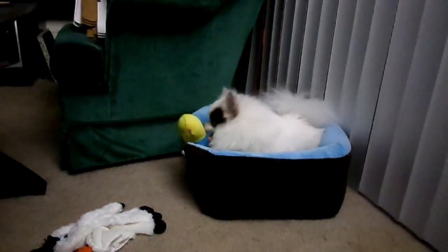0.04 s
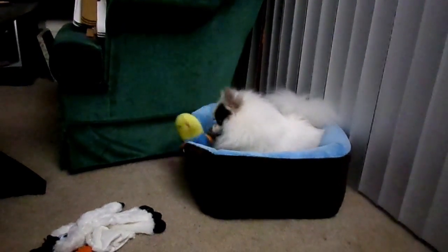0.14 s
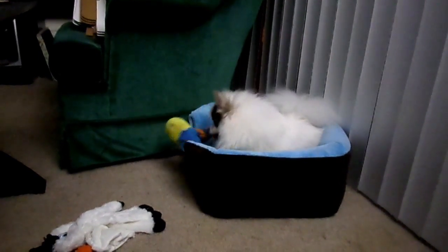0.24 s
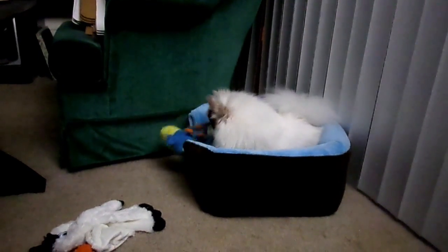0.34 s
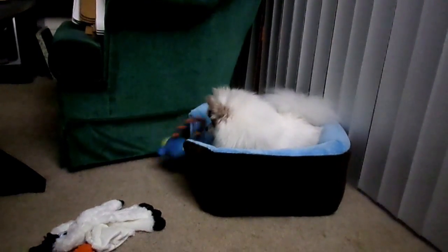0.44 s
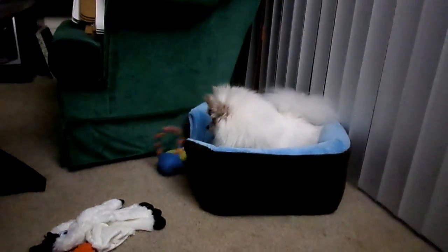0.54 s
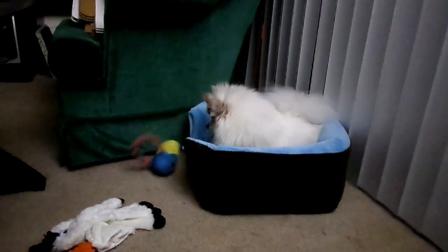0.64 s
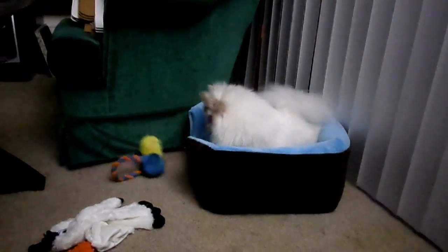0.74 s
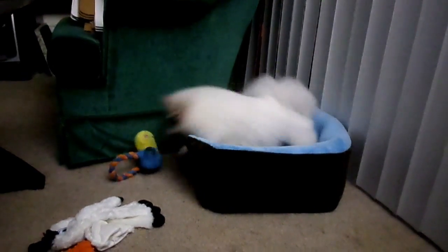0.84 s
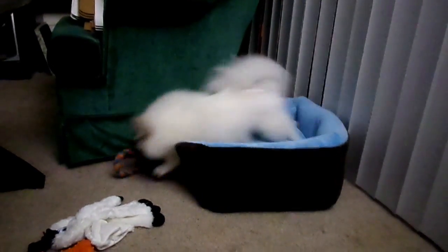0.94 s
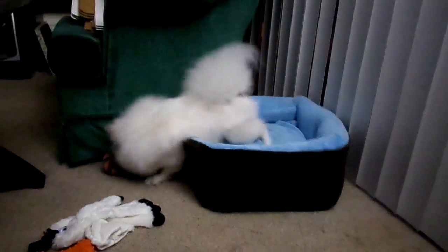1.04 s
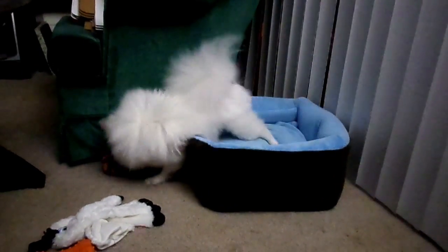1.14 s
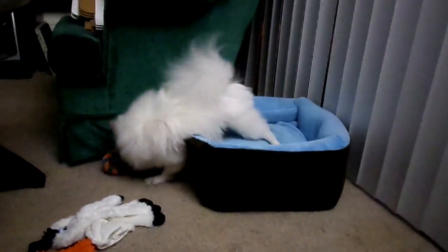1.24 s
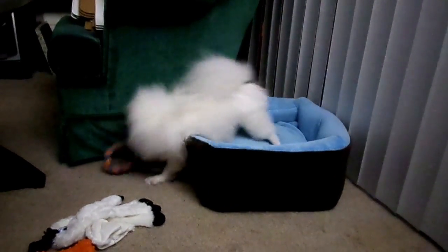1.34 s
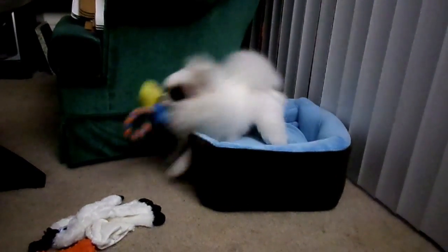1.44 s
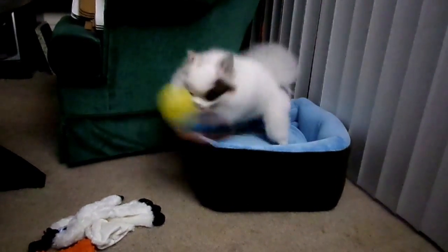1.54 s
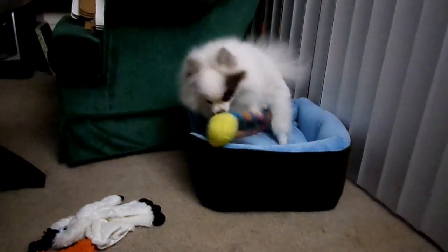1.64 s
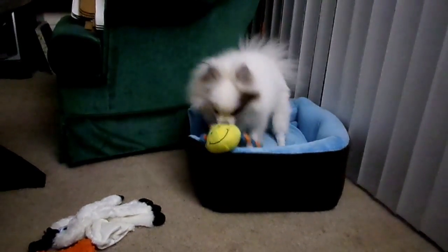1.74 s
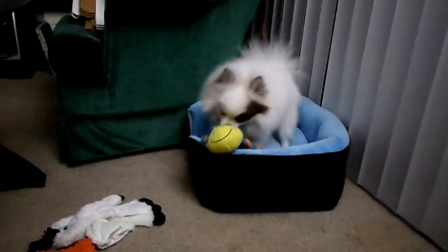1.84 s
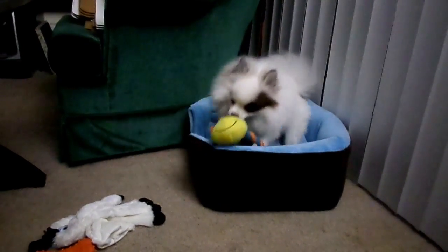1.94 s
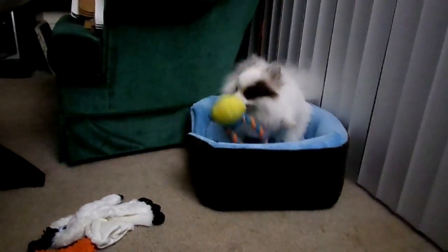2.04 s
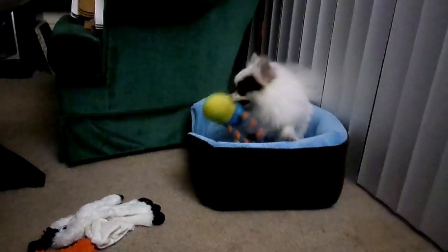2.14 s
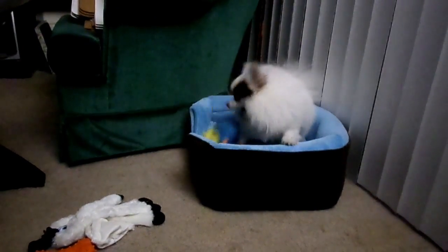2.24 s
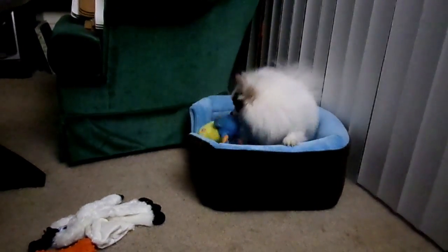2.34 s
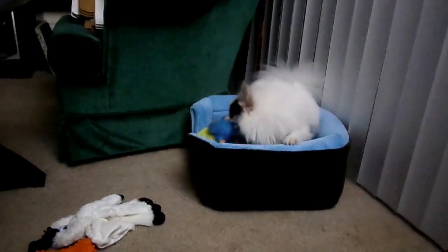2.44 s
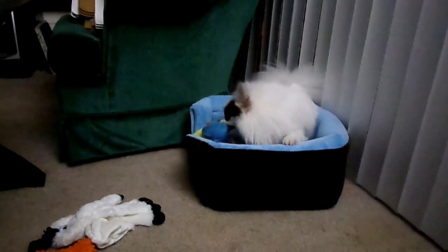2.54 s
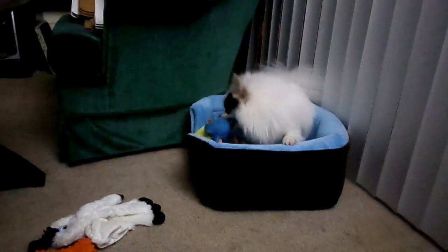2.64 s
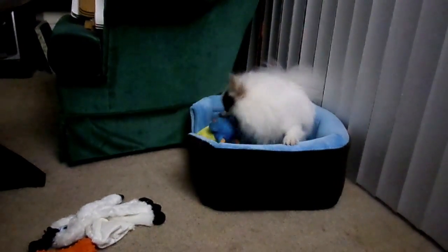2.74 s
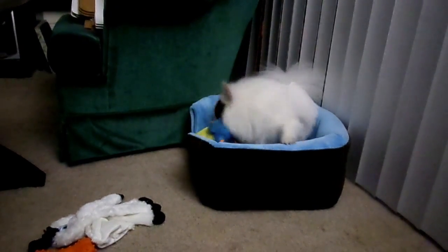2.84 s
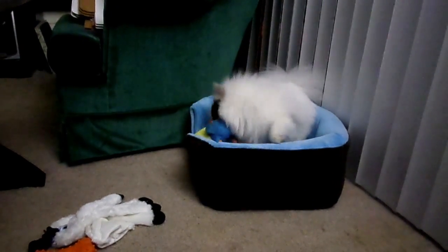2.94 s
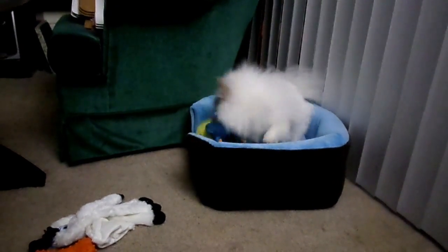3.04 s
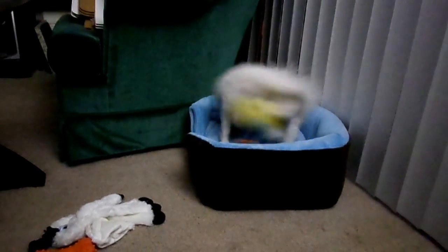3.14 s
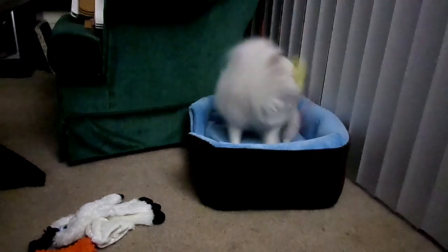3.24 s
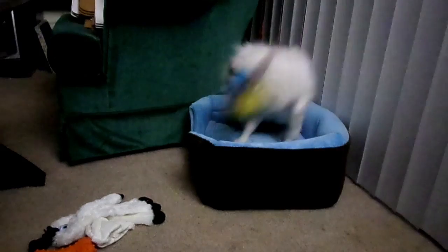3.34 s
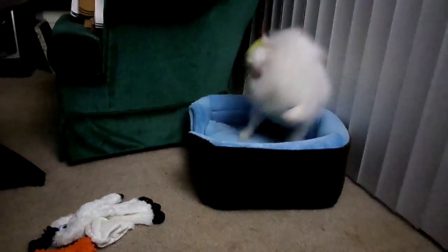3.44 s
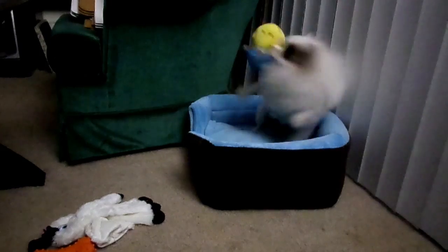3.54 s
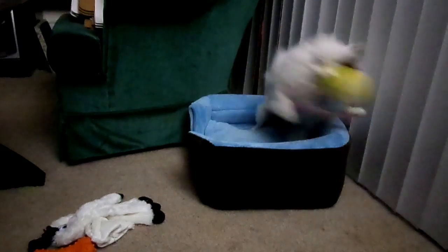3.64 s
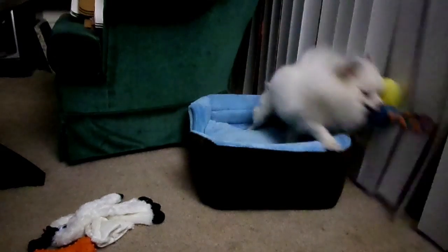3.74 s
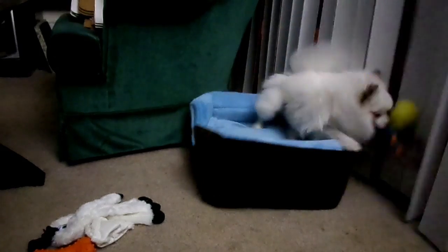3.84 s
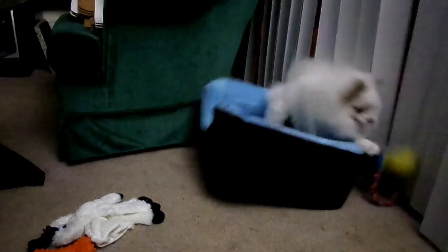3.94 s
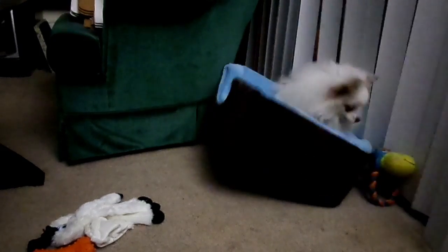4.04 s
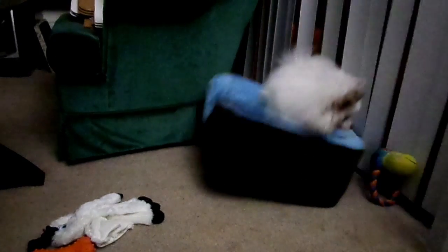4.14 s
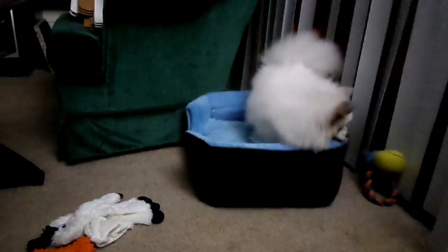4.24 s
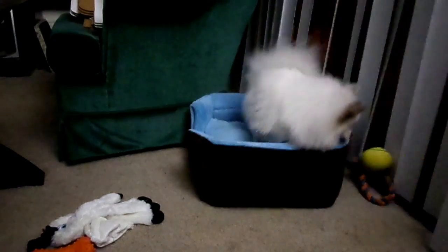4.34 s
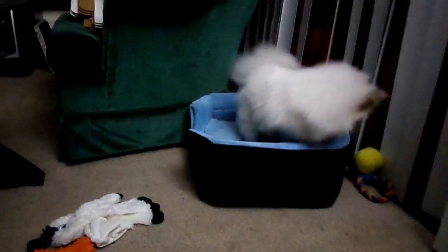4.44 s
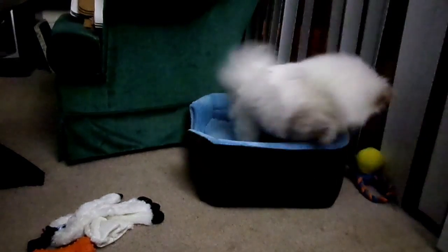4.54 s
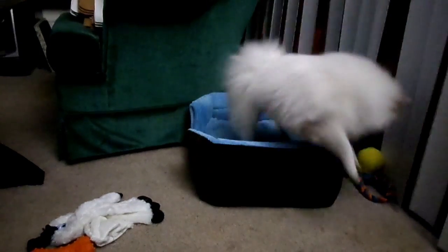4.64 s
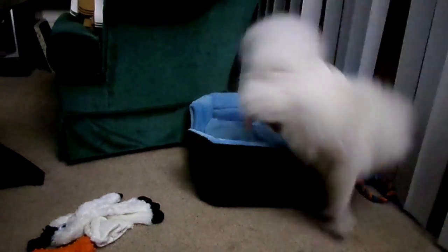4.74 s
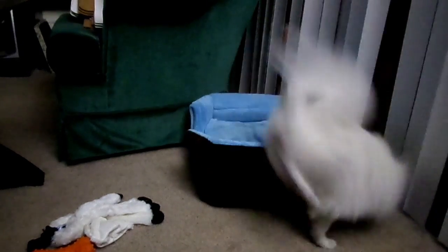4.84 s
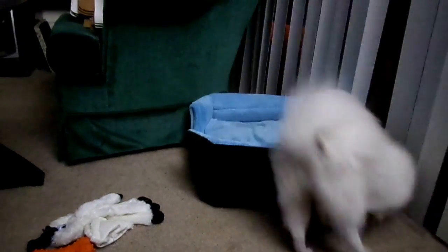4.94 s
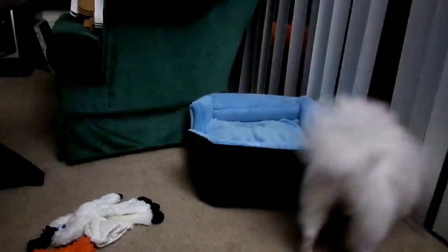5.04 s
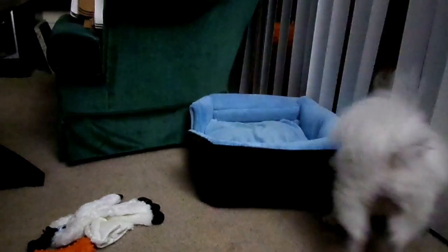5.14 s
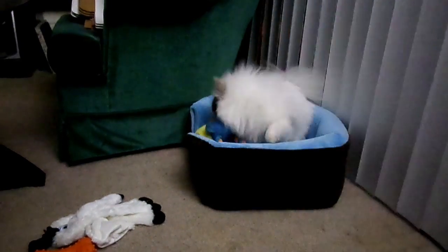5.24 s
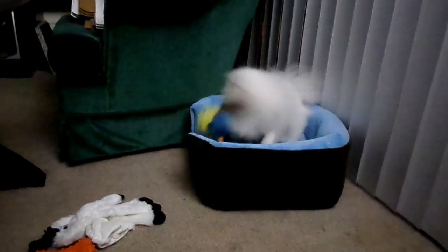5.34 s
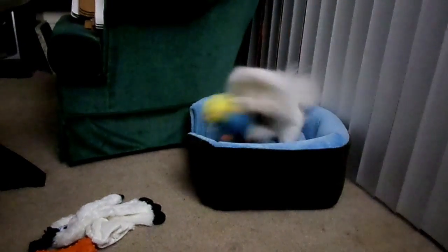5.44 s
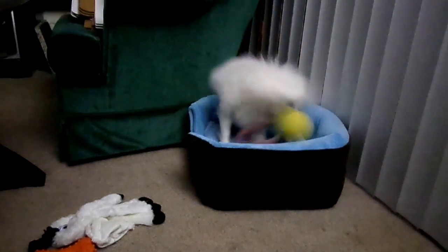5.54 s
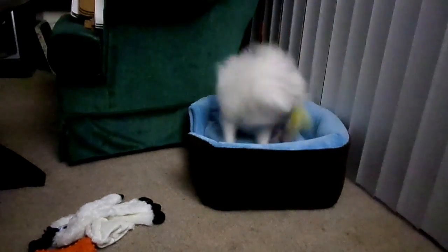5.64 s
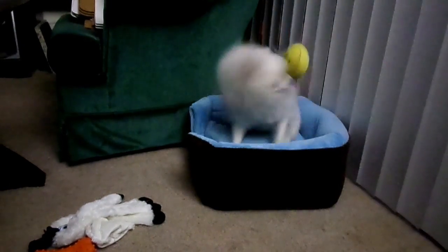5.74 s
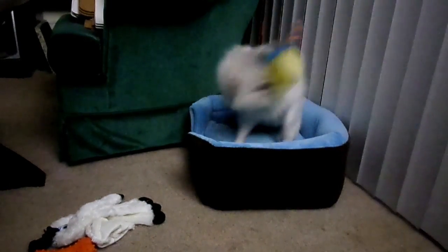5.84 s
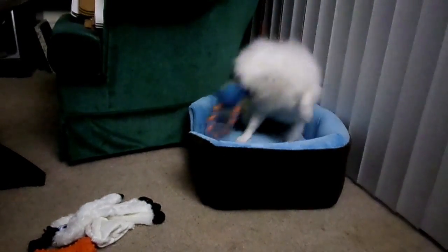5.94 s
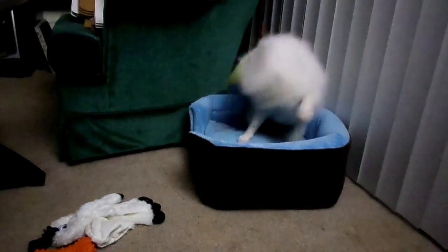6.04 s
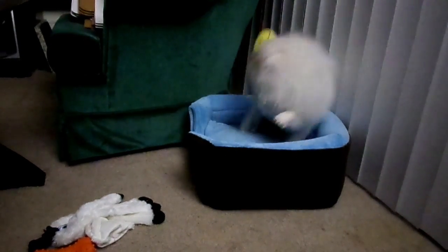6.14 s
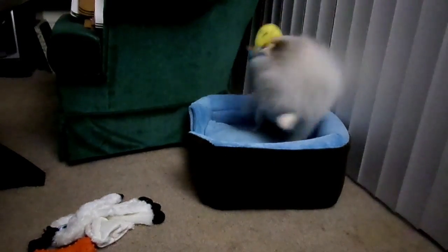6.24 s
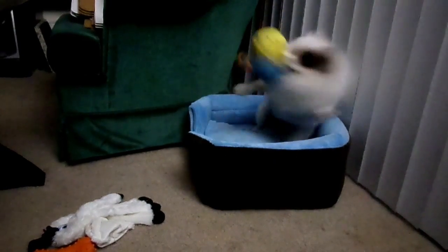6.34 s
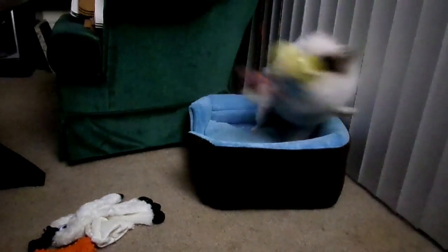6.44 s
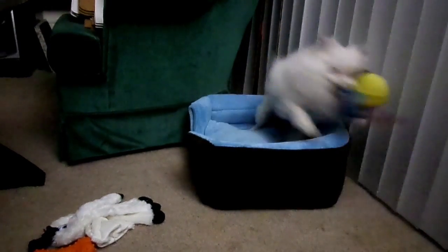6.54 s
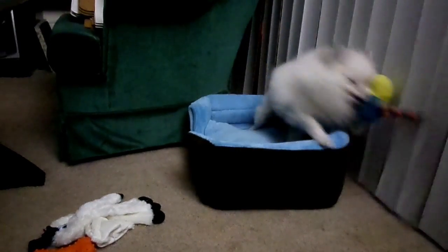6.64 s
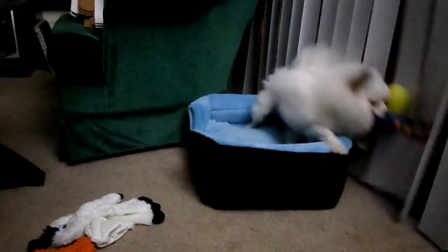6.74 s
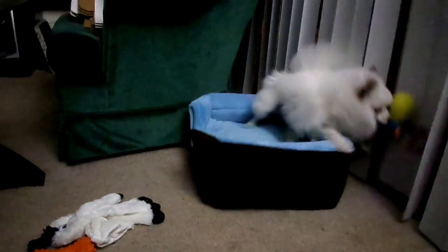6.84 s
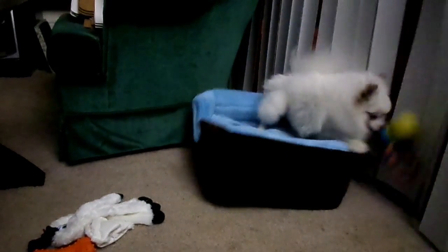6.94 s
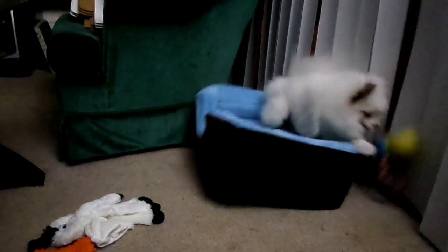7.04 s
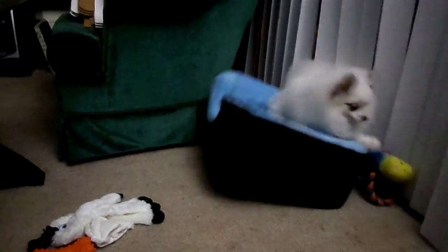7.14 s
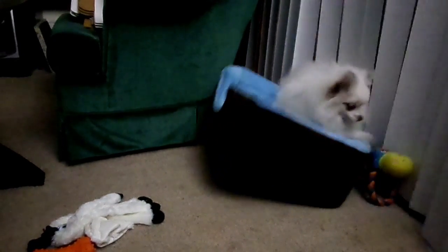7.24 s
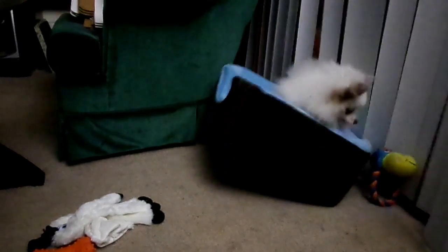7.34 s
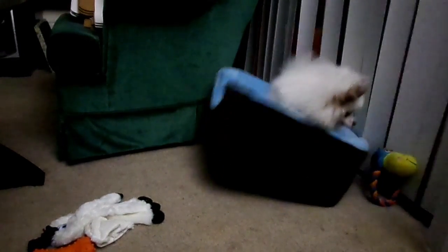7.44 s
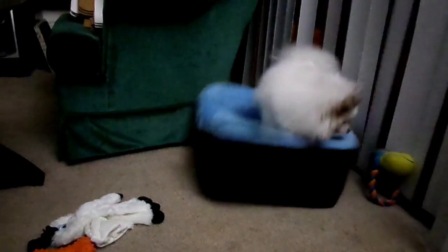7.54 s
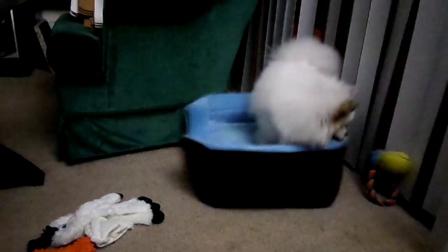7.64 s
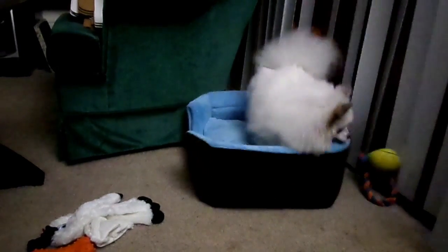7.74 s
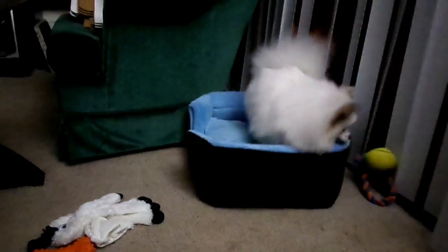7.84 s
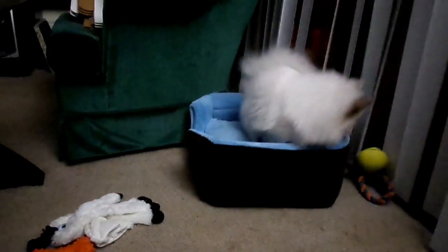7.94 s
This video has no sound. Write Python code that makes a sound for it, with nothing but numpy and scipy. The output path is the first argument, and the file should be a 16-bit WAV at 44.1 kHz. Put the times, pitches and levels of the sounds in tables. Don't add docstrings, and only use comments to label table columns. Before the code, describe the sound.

In a quiet carpeted room, a small puppy thumps about its soft bed with a toy, giving one tiny snort and nudging vertical plastic blinds into faint ticks. It suddenly tumbles into them: a hard overloaded crack, then dense bright slaps, rattles and hollow booming from the window recess. Flurries continue until a cut, when the tumble repeats at half speed, duller and an octave lower. Close hand-held small camera microphone.

```python
import sys
import numpy as np
from scipy import signal
from scipy.fft import rfft, irfft, next_fast_len
from scipy.io import wavfile
from scipy.ndimage import uniform_filter1d, map_coordinates

SR = 44100
rng = np.random.default_rng(int(sys.argv[2]) if len(sys.argv) > 2 else 0)


def master(y):
    cut = np.clip(np.atleast_2d(y).T, -1, 1)
    pcm = np.round(cut * 32767)
    wavfile.write(sys.argv[1], SR, pcm.astype(np.int16))


def ratio_of_db(decibels):
    return 10 ** (np.asarray(decibels, float) / 20)


N = 352800

# (frequency [Hz], level [dB per Hz])
EDGE_COLOUR = [(2900, -31), (5000, -24), (6900, -11), (9000, -5), (11900, 3.5), (13500, -5), (15000, -9.5),
               (17500, -17)]
# (frequency [Hz], level [dB per Hz])
FACE_COLOUR = [(530, -25.5), (900, -2), (1410, -3), (1530, -3.5), (2350, -3.5), (3970, -5.5), (7000, -3.5),
               (9100, -6), (15400, -120)]
# (time of peak [s], chatter [dB], face over chatter [dB], rise t60 [s], fall t60 [s])
SWINGS = [(3.525, -31.5, -19, 0.0112, 0.76), (3.56, -28, -12, 0.11, 0.62), (3.656, -16, -8, 0.027, 0.17),
          (3.7, -11, -16, 0.12, 0.22), (3.755, -12, -9.5, 0.17, 0.2), (3.815, -20, -9, 0.11, 0.21),
          (3.934, -28.5, -7, 0.81, 0.68), (4.046, -31, -8.5, 0.2, 0.76), (4.183, -34, -5.5, 0.079, .8),
          (4.24, -37.5, -12, 0.42, 0.57), (4.289, -30, -8, 0.18, 0.26), (4.39, -25.5, -13, 0.096, 0.091),
          (4.455, -38, -4.5, 0.47, 0.43), (4.523, -28, -2.5, 0.017, 0.31), (4.623, -32, -6, 0.26, 0.48),
          (4.723, -30, -7.5, .11, 0.35), (4.812, -35, -11, 0.13, 0.083), (4.861, -36.5, -8, 0.12, .22),
          (4.956, -31.5, -3.5, 0.031, 0.15), (5.03, -31, -5, 0.55, 0.41), (5.156, -25.5, -9, 0.045, 0.37)]


def unit(x):
    return x / np.sqrt(np.mean(x ** 2) + 1e-20)


def along(points, hz):
    point_hz, value = np.transpose(points)
    return np.interp(np.log(hz + 1), np.log(point_hz + 1), value)


def curve(points):
    s, value = np.transpose(points)
    return np.interp(np.arange(N) / SR, s, value)


def filtered(x, response):
    size = next_fast_len(N + SR // 2)
    h = response(np.fft.rfftfreq(size, 1 / SR))
    level_kept = unit(np.abs(h)) * np.exp(1j * np.angle(h))
    return irfft(rfft(x, size) * level_kept, size)[:N]


def colour(points):
    return lambda hz: ratio_of_db(along(points, hz))


def modes(rows):
    def response(f):
        total = 0
        for k, (centre, width, db) in enumerate(rows):
            resonance = 1j * f * width / (centre * centre - f * f + 1j * f * width)
            total = total + (-1) ** k * ratio_of_db(db) * resonance
        return total
    return response


def swell(s, db, rise, fall):
    t = np.arange(0, N / SR, .001)
    late = t - s[:, None]
    before_peak, after_peak = -late / np.abs(rise)[:, None], late / np.abs(fall)[:, None]
    decades = np.where(late < 0, before_peak, after_peak)
    power = ratio_of_db(db[:, None] - 60 * decades) ** 2
    return np.interp(np.arange(N) / SR, t, np.sqrt(power.sum(0)))


def bursts(s, db, decay_ms, face_hz=None, width=.35, direct=.89, size=768):
    strike = 1.6
    k = np.arange(size)
    decay_ms = np.clip(decay_ms, .15, 6)[:, None]
    puffs = rng.standard_normal((len(s), size)) * np.exp(-1000 * k / SR / decay_ms)
    puffs[:, 0] += strike * np.sign(puffs[:, 0])
    if face_hz is not None:
        f, c = np.fft.rfftfreq(size, 1 / SR), face_hz[:, None]
        resonance = 3j * f * width * c / (c * c - f * f + 1j * width * f * c)
        puffs = irfft(rfft(puffs) * (direct + resonance), size)
    puffs *= np.sqrt(decay_ms * SR / 2000) / np.linalg.norm(puffs, axis=1, keepdims=True)
    at = np.round(s * SR).astype(int)[:, None] + k
    return np.bincount(at.ravel(), (ratio_of_db(db)[:, None] * puffs).ravel(), N + SR)[:N]


def room(x):
    # (frequency [Hz], t60 [s])
    room_t60 = [(300, 0.35), (2000, 0.064), (8000, 0.093), (15000, 0.15)]
    hz, t, z = signal.stft(rng.standard_normal(SR // 2), SR, nperseg=256)
    fading = z * ratio_of_db(-60 * t / along(room_t60, hz)[:, None])
    tail = signal.istft(fading, SR, nperseg=256)[1]
    delayed = np.pad(x, (130, 0))
    return signal.fftconvolve(delayed, tail / np.linalg.norm(tail))[:N]


def hush():
    # (frequency [Hz], level [dB per Hz])
    hush_colour = [(20, -75.5), (40, -14), (167, 0.5), (328, 0), (580, -6), (1100, -9.5), (4550, -17.5),
                   (10300, -17.5), (15000, -23), (17500, -23.5)]
    # (time [s], level [dB])
    room_db = [(0, -60.5), (.5, -64.5), (1.3, -58.5), (2.9, -63), (3.26, -58.5), (5.27, -54.5)]
    # (time [s], level [dB])
    hand_db = [(0, -92), (.44, -94), (1.01, -76), (1.28, -91), (1.6, -81), (2.73, -85), (3.26, -66.5),
               (3.79, -60), (4.27, -60), (4.55, -77), (4.73, -65), (5.27, -60)]
    stir_db, stir_s = -29, 0.14
    s, db, _, rise, fall = np.transpose(SWINGS)
    stirred = swell(s, db + stir_db, rise + stir_s, fall + stir_s)
    level = np.hypot(ratio_of_db(curve(room_db)), stirred)
    tone = filtered(rng.standard_normal(N), colour(hush_colour))
    hand_colour = colour([(8, -31.0), (30, -5.0), (90, -10.0), (250, -35), (600, -120)])
    rumble = filtered(rng.standard_normal(N), hand_colour)
    return ratio_of_db(5.5) * level * tone + ratio_of_db(curve(hand_db) + 4.5) * rumble


def grain(share, low_hz, high_hz):
    still_s = .65
    s, size, pitch = rng.random((8000, 3)).T
    tick_hz = low_hz * (high_hz / low_hz) ** pitch
    ticks = bursts(5.3 * s, 16 * size ** 3, .3 + .6 * size, tick_hz, width=.22, size=192)
    z = signal.stft(rng.standard_normal(N), nperseg=256)[2]
    patches = uniform_filter1d(rng.standard_normal(z.shape), size=4, axis=0)
    patches = uniform_filter1d(patches, size=7, axis=1)
    scrape = signal.istft(z * ratio_of_db(4 * unit(patches)), nperseg=256)[1][:N]
    moving = np.arange(N) > still_s * SR
    return unit(share * unit(ticks) + unit(scrape)) * moving


def rattle():
    # (time of peak [s], chatter [dB], face over chatter [dB], rise t60 [s], fall t60 [s])
    nudges = [(.76, -53, -7.5, 0.15, 0.73), (.947, -52.5, -7, 0.73, 0.66), (1.168, -54.5, -10.5, .2, 1.9),
              (1.492, -42, -11, 0.15, 0.17), (1.54, -54.5, -6.5, .3, 2.2), (1.924, -42.5, -11.5, 0.13, 0.3),
              (2.05, -63, -7, .6, 4.8), (3.01, -57.5, -6.5, 0.69, .2), (3.087, -50, -3.5, 0.26, 1.3),
              (3.231, -52.5, -27, 0.66, 1.4), (3.295, -50.5, 0.5, 0.18, 0.44), (3.355, -41, -6, 0.13, 0.35)]
    s, db, face_db, rise, fall = np.transpose(nudges + SWINGS)
    chatter = filtered(grain(0.59, low_hz=5790, high_hz=17000), colour(EDGE_COLOUR))
    edges = ratio_of_db(-4.0) * swell(s, db, rise, fall) * chatter
    scrape = filtered(grain(0.49, low_hz=1500, high_hz=7740), colour(FACE_COLOUR))
    return edges + ratio_of_db(2.0) * swell(s, db + face_db, rise, fall) * scrape


def rebounds():
    # (time [s], level [dB],
    # frequency [Hz])
    rebound_ticks = [(0.7475, -44, 11700), (0.7534, -41, 12500), (0.7617, -46, 12300), (0.777, -48, 3400),
                     (0.7771, -37, 12200), (0.7829, -40, 11400), (0.7848, -44, 11700), (0.8929, -45, 12400),
                     (0.9525, -44, 11300), (0.961, -48.5, 11300), (0.9919, -45, 11400),
                     (1.0538, -49.5, 11500), (1.0746, -49, 6800), (1.1146, -48, 11700), (1.163, -46, 11220),
                     (1.1712, -42, 10600), (1.4547, -51, 11100), (1.4868, -42.5, 12100),
                     (1.4935, -39.5, 11700), (1.5516, -47, 11500), (1.576, -46, 3500), (1.5782, -49, 12300),
                     (1.5825, -46, 6800), (1.6334, -42, 11200), (1.6592, -49, 11700), (1.7019, -47, 11600),
                     (1.7051, -47, 12000), (1.876, -47, 11200), (2.0268, -50, 6800), (2.1457, -49, 10900),
                     (3.0648, -40, 1900), (3.0676, -49, 10100), (3.0814, -46, 11700), (3.2019, -32, 10600),
                     (3.2838, -44, 5700), (3.3551, -27, 11500), (3.3726, -35, 11800), (3.4324, -45, 2380),
                     (3.5241, -34, 11200), (3.5814, -14.5, 12700), (3.6922, -12, 11600),
                      (3.7536, -6, 6900), (3.8127, -15.5, 12700), (3.825, -21.5, 6200),
                      (3.8748, -24, 11760), (3.9009, -29, 11800), (3.901, -29.5, 4600),
                      (3.9226, -15.5, 10740), (3.9403, -11.5, 11700), (3.941, -16.5, 5560),
                      (3.965, -21.5, 11650), (4.0089, -32, 5100), (4.0382, -29.5, 10770),
                      (4.0883, -30.5, 6500), (4.114, -33, 4900), (4.1263, -34, 11130),
                      (4.1704, -34.5, 11160), (4.178, -29.5, 10100), (4.1815, -30.5, 10850),
                      (4.1835, -38, 3620), (4.2036, -28.5, 10870), (4.269, -34, 3220), (4.277, -33.5, 3700),
                      (4.2856, -25.5, 10670), (4.3648, -28, 11500), (4.3685, -22, 11160),
                      (4.3953, -24.5, 11630),
                     (4.429, -33, 11200), (4.4314, -31, 11700), (4.5685, -23, 11400),
                     (4.5716, -23.5, 11300), (4.5778, -26, 11100), (4.6095, -23, 11400),
                     (4.6129, -23.5, 10900), (4.6297, -28, 11600), (4.6428, -30, 11700),
                     (4.6504, -30, 6600), (4.6556, -31.5, 10900), (4.7042, -28, 12400),
                     (4.7197, -17, 12600), (4.7251, -15, 11800), (4.7292, -32.5, 6300),
                     (4.7389, -26.5, 11200), (4.8041, -24, 11600), (4.8093, -27, 11550),
                     (4.8151, -34, 11800), (4.8695, -25, 10600), (4.9053, -32, 5800), (4.9248, -33.5, 3400),
                     (4.9443, -28, 11100), (4.997, -18, 10000), (5.0003, -24, 4500), (5.0003, -23, 11100),
                     (5.027, -20, 11800), (5.0318, -26, 3600), (5.0633, -29, 11000), (5.1262, -27, 11800),
                     (5.1294, -34, 11630), (5.1495, -14.5, 11070), (5.1557, -10.5, 7420),
                     (5.1564, -9, 11700), (5.1761, -32.5, 6300), (5.1761, -24.5, 11700),
                     (3.6526, -6, 13500), (3.6045, -22, 11800), (3.8227, -22.5, 7100), (3.8157, -16.5, 12200),
             (4.1516, -28, 8600), (4.2698, -26.5, 6500), (4.3726, -40, 2960), (5.7, -19, 11700),
             (4.8305, -40, 6500), (6, -28, 2600), (3.8, -30, 3300), (4.5917, -29, 11500)]
    s, db, hz = np.transpose(rebound_ticks)
    decay_ms = np.full(len(s), 0.54)
    ticks = bursts(s, db + 3.5, decay_ms, hz, width=0.12, direct=.03)
    return ticks + ratio_of_db(-8.0) * room(ticks)


def slaps():
    # (time [s], edge [dB], face over edge [dB], face frequency [Hz], decay [ms])
    clacks = [(3.5795, -19, -6, 5060, 1.3), (3.65, -0.5, 1.5, 7000, 1.3), (3.6551, 5, -7, 5740, 0.59),
              (3.6808, -15.5, -1.5, 1000, 5.3), (3.6921, 5, -13.5, 2100, 0.76),
              (3.7457, -12.5, 8, 3600, 1.3), (3.7534, -13, 4, 3300, 2.2), (3.7612, -13, -7, 5000, 2.5),
              (3.812, -14, -5.5, 1860, 1.7), (3.8977, -4, -16.5, 5700, 0.28), (3.9388, 3, -3, 4070, 0.46),
              (4.039, -34.5, 13, 6700, 2), (4.1817, -19.5, 1.5, 1160, 0.41), (4.2124, -6, 3, 8450, 0.51),
              (4.2134, -17.5, -1.5, 3470, 2), (4.4443, -14.5, 1.5, 5100, 1.3),
              (4.5189, -5.5, -0.5, 2620, 4.4), (4.62, -12, 2, 4640, 2.25),
              (4.7063, -13.5, -2.5, 2750, 0.71), (4.8512, -7.5, -20, 4130, 0.8),
              (4.926, -28.5, -1, 3300, 4), (4.9499, -10.5, 0, 3320, 4.5), (4.992, -7.5, -5, 3060, 0.59),
              (5.152, 0.5, -10, 2010, 0.49), (5.182, -17.5, 0.5, 5400, 1.8)]
    # (time [s], edge [dB], face over edge [dB], face frequency [Hz], decay [ms])
    taps = [(0.758, -48, 16.5, 3700, 0.7), (.935, -38, -9, 1000, 4), (1.0708, -35, 2, 8200, 1.1),
            (1.099, -36, 0, 2100, .3), (1.4608, -36, 1, 3800, .6), (1.465, -35.5, 1, 2680, 1.5),
            (1.583, -29, -6, 1200, .6), (2.0142, -36.5, -16, 7500, 1.8), (2.394, -42, 4, 5500, 1.2),
            (2.612, -49, 13, 2300, 1.4), (3.105, -40.5, 8.5, 3480, 1.9), (3.162, -53.5, 17.5, 4700, 1.1),
            (3.201, -34.5, -6, 2600, 2.4), (3.2154, -41.5, 12.5, 3000, .6), (3.2467, -38.5, 9, 1780, 1.3),
            (3.3647, -34.5, 4, 1500, 1.8), (3.295, -27.5, 5, 6200, 1.6), (3.345, -16, -32, 11000, 0.27),
            (3.357, -16, -16, 2900, 0.42), (3.523, -34, -0.5, 6320, 1.1)]
    # (time [s], level [dB])
    edge_ticks = [(3.7225, -7.5), (3.876, -19.5), (3.9233, -11), (3.9548, -21), (3.9706, -10),
                  (4.0422, -10), (4.075, -19.5), (4.096, -14.5), (4.12, -19.5), (4.1406, -22),
                  (4.1702, -29.5), (4.2006, -17.5), (4.238, -10), (4.2474, -13), (4.2785, -10.5),
                  (4.2946, -10.5), (4.3006, -9), (4.366, -17.5), (4.3885, -9), (4.568, -12.5),
                  (4.61, -18.5), (4.6504, -20.5), (4.7283, -14.5), (4.783, -22.5), (4.803, -19),
                  (4.914, -20), (5.023, -3.5), (5.035, -10), (5.0686, -12), (5.2359, -11.5), (5.233, -24)]
    # (time [s], level [dB])
    faint_ticks = [(0.753, -35.5), (.777, -37), (0.7808, -24), (.8701, -38), (0.904, -24), (1.8755, -36),
                   (1.021, -34), (1.0531, -44), (1.425, -32), (1.616, -28.5), (1.6332, -40), (1.905, -29),
                   (1.9151, -36.5), (2.0268, -40.5), (2.1427, -29)]
    # (time [s], level [dB])
    snaps = [(3.673, -19), (3.7186, -28), (3.7396, -10.5), (3.7462, -6), (3.7534, -2), (3.7608, 1.5),
             (3.8252, -17.5), (3.9626, -9.5), (4.2894, -22), (4.3801, -33), (4.7168, -13.5),
             (4.8185, -23.5), (4.9055, -23), (5.1124, -22), (5.1095, -28), (5.176, -11.5), (5.188, -14.5)]
    # (frequency [Hz], level [dB per Hz])
    rim_colour = [(3900, -37.5), (7000, -19), (9000, -3.5), (11900, 5), (14000, -7.5), (15500, -12.5),
                  (17000, -25.5)]
    tick_ms, tick_face_db, faint_face_db = 0.52, -9.5, -11

    touches = [(s, db, tick_face_db) for s, db in edge_ticks]
    touches += [(s, db, faint_face_db) for s, db in faint_ticks]
    touches += [(s, db, tick_face_db) for s, db in snaps]
    spot_hz = 1000 * 7 ** rng.random(len(touches))
    ticks = [(*touch, hz, tick_ms) for touch, hz in zip(touches, spot_hz)]
    s, db, face_db, face_hz, decay_ms = np.transpose(clacks + taps + ticks)
    hard = len(clacks + taps)
    edge = filtered(bursts(s[:hard], db[:hard] - 4.0, decay_ms[:hard]), colour(EDGE_COLOUR))
    rim = filtered(bursts(s[hard:], db[hard:] - 3.0, decay_ms[hard:]), colour(rim_colour))
    face = bursts(s, db + face_db - 10.5, 1.7 * decay_ms, face_hz, direct=0.5)
    return edge + rim + filtered(face, colour(FACE_COLOUR))


def rings():
    # (time [s], level [dB], frequency [Hz])
    ringing_modes = [(0.759, -52, 4500), (0.759, -47, 3500), (0.759, -47, 400), (3.65, -17, 6960),
                     (3.65, -21, 990), (3.65, -18, 8200), (3.746, -21, 4360), (3.746, -20, 6150),
                     (3.746, -22, 3290), (3.9386, -33, 9950), (3.9386, -29, 9490), (3.938, -29, 4470),
                     (4.039, -29.5, 714), (4.039, -31, 5400), (4.039, -35, 6730), (4.181, -30, 1160),
                     (4.181, -41, 620), (4.212, -20.5, 9830), (4.4445, -34, 5060), (4.4445, -37, 6650),
                     (4.4445, -39, 360), (4.5186, -19, 10000), (4.5189, -25, 3100), (4.5186, -21, 6430),
                     (4.62, -33, 4840), (4.62, -33, 6070), (4.62, -34, 7410), (4.706, -35, 4110),
                     (4.7068, -37, 550), (4.7068, -37, 8130), (4.851, -40, 8910), (4.851, -41, 4170),
                     (4.949, -27, 5280), (4.949, -32, 7950), (4.949, -37, 4180), (4.992, -24, 10170),
                     (4.992, -32, 550), (4.992, -33, 2070), (5.15, -19, 9690), (5.151, -27, 8360),
                     (5.151, -28, 5210), (5.18, -35, 5380), (5.18, -36, 8400), (5.18, -40, 10140)]
    t60_s, onset_s = 0.026, 0.00039
    s, db, hz = np.transpose(ringing_modes)[..., None]
    t = np.arange(SR // 20) / SR
    envelope = ratio_of_db(db + 5 - 60 * t / t60_s) * (1 - np.exp(-t / onset_s))
    tones = envelope * np.sin(2 * np.pi * (hz * t + rng.random(s.shape)))
    at = np.round(s * SR).astype(int) + np.arange(len(t))
    return np.bincount(at.ravel(), tones.ravel(), N)[:N]


def recess():
    # (frequency [Hz], width [Hz], level [dB])
    air_modes = [(403.6, 19.7, 4), (558, 155, -1), (673, 202, -0.5), (797, 29, 1.5)]
    # (time of peak [s], level [dB], rise t60 [s], fall t60 [s])
    pushes = [(.781, -44, 0.12, 0.17), (.93, -50.5, 0.62, 2.3), (1.168, -50.5, 0.15, 0.32),
              (1.5, -50, 0.14, .8), (1.65, -45.5, 0.39, 0.39), (1.924, -44.5, 0.11, 0.34),
              (2.1, -58.5, .5, 1.8), (3.02, -58, 0.37, 0.069), (3.1, -53.5, 0.21, 1.4),
              (3.36, -42, .08, 0.25), (3.581, -35, 0.08, 0.12), (3.7, -21.5, 0.08, 0.08),
              (3.8, -33.5, 0.22, 2.9), (4.046, -42, 0.59, 0.27), (4.24, -38, 0.66, .25),
              (4.289, -37, 0.24, .8), (4.39, -37.5, 0.55, .12), (4.455, -36.5, 0.18, 0.11),
              (4.535, -30.5, 0.054, 0.3), (4.623, -31, 0.07, 0.34), (4.723, -40, 0.16, 0.57),
              (4.835, -38.5, 0.056, 0.56), (4.93, -44, .5, .3), (5.03, -29.5, 0.19, 0.15),
              (5.13, -37, 0.1, 0.085), (5.2, -39, 0.89, 0.97)]
    # (time of peak [s], level [dB], rise t60 [s], fall t60 [s])
    drones = [
        (.79, -55.5, 0.23, 0.95),
        (1.2, -54.5, 0.51, 0.26),
        (1.6, -64, .6, 0.8),
        (1.97, -52.5, 0.25, 0.35),
        (3.42, -48, 0.46, 0.19),
        (3.657, -37, 0.062, 0.66),
        (3.92, -42.5, .8, 0.25),
        (4.44, -51, 0.36, 0.22),
        (4.74, -49.5, .3, 0.51),
        (5.23, -49, .4, 0.19),
    ]
    lumps_db, lumps_per_s = 2.2, 25
    lumps = map_coordinates(rng.standard_normal(260), [np.arange(N) * lumps_per_s / SR])
    deep = filtered(rng.standard_normal(N), modes(air_modes[:1]))
    upper = filtered(rng.standard_normal(N), modes(air_modes[1:]))
    booms = swell(*np.transpose(pushes)) * ratio_of_db(lumps_db * lumps - 5.5)
    return booms * (upper + ratio_of_db(-10.5) * deep) + swell(*np.transpose(drones)) * deep


def thumps():
    # (time [s], peak level [dB], frequency [Hz], t60 [s])
    blows = [(.78, -40, 705, 0.04), (0.938, -39.5, 540, 0.034), (1.34, -52, 247, 0.035),
             (1.428, -38, 200, 0.064), (1.9, -41, 527, 0.065), (2.06, -42, 173.5, 0.034),
             (3.066, -36.5, 70, .14), (3.4, -38, 300, 0.046), (4.46, -42, 137, .15),
             (4.561, -45, 135, 0.13), (1.435, -48, 80, .08), (1.36, -45, 200, 0.068), (.94, -50, 120, 0.13),
             (1.46, -41, 170, .05), (3.89, -34, 130, 0.06), (4.04, -35.5, 310, 0.065),
             (3.6545, -7, 440, 0.04), (3.65, -15, 480, 0.037), (3.748, -21.5, 272.6, 0.11),
             (3.938, -28.5, 650, 0.047), (3.139, -39, 233, 0.07), (4.141, -23.5, 150, 0.066),
             (4.18, -35, 270, 0.083), (4.519, -19.5, 596, 0.025), (4.95, -27, 627, 0.047),
             (5.149, -27.5, 657, 0.058)]
    out, t = np.zeros(N + SR), np.arange(SR // 4) / SR
    for s, db, hz, t60 in blows:
        drift = 0.0246 * np.cumsum(rng.standard_normal(len(t)))
        band = signal.butter(2, [.58 * hz, 2.4 * hz], "band", fs=SR)
        puff = unit(signal.lfilter(*band, rng.standard_normal(len(t))))
        body = np.sin(2 * np.pi * hz * t + drift) + 0.4 * puff * ratio_of_db(25 * t / t60)
        onset = 1 - np.exp(-t * hz / 0.77)
        out[round(s * SR):][:len(t)] += ratio_of_db(db + 1.5 - 60 * t / t60) * onset * body
    return out[:N]


def snort():
    # (time [s], half length [s], level [dB])
    nose_puff = (1.316, 0.028, -45)
    # (frequency [Hz], width [Hz], level [dB])
    nose_modes = [(1600, 760, -1), (4040, 290, 4.5), (7160, 700, 0), (11700, 1200, 1)]
    s, half, db = nose_puff
    envelope = np.exp(-np.abs((np.arange(N) / SR - s) / half) ** 3)
    return ratio_of_db(db) * envelope * filtered(rng.standard_normal(N), modes(nose_modes))


def scene():
    near = slaps() + snort()
    blinds = rattle() + rebounds() + rings() + recess()
    return (near + ratio_of_db(-8.5) * room(near) + blinds + thumps() + hush())[None]


def stored(x):
    # (frequency [Hz], level against their surroundings [dB])
    thinning = [(2000, -18), (11000, -13), (13000, -8), (14500, -2), (17000, 0)]
    top_hz = 17120
    hz, _, z = signal.stft(x, SR, nperseg=1024)
    power = uniform_filter1d(np.abs(z) ** 2, size=25, axis=0)
    around = np.sqrt(uniform_filter1d(power, size=3, axis=1) + 1e-20)
    strong = np.abs(z) > ratio_of_db(along(thinning, hz))[:, None] * around
    keep = strong & (hz < top_hz)[:, None]
    return signal.istft(z * keep, SR, nperseg=1024)[1][:N]


def band_limit(x):
    return signal.sosfilt(signal.butter(12, 16430, fs=SR, output="sos"), x)


def record(dry):
    # (start [s], end [s], level [dB])
    gaps = [
        (3.039, 3.043, -12),
        (3.6405, 3.6445, -45),
        (4.204, 4.209, -6),
        (4.357, 4.363, -4),
        (4.433, 4.441, -7),
        (4.938, 4.943, -6),
        (4.383, 4.386, -6),
        (4.268, 4.269, -4),
        (5.244, 5.257, -13),
    ]
    replay_at_s, replay_shift_s = 5.256, .8395
    live_top_hz = 15950
    t = np.arange(N) / SR
    gain_db = np.zeros(N)
    for a, b, db in gaps:
        gain_db += np.interp(t, [a - .002, a, b, b + .002], [0, db, db, 0])
    live = stored(dry[0]) * ratio_of_db(gain_db)
    slow = signal.resample(live, 2 * N)[round(replay_shift_s * SR):][:N]
    live = irfft(rfft(live) * (np.fft.rfftfreq(N, 1 / SR) < live_top_hz), N)
    cut = np.where(t < replay_at_s, live, slow)
    mix = np.clip(cut, -1, 1)[None]
    return band_limit(mix)


dry = scene()
out = record(dry)
master(out)
```